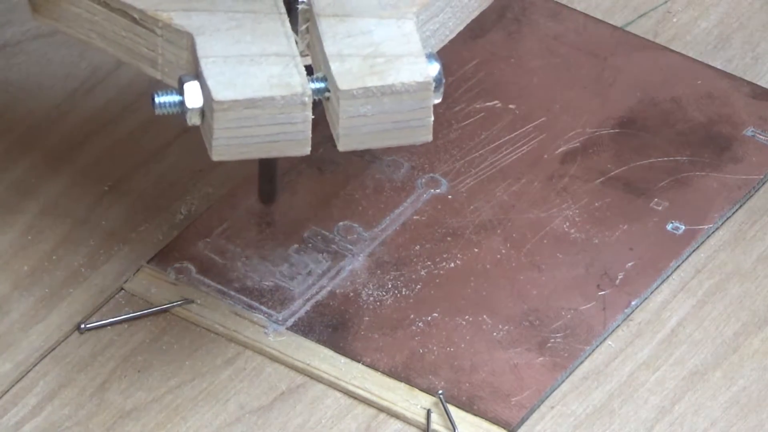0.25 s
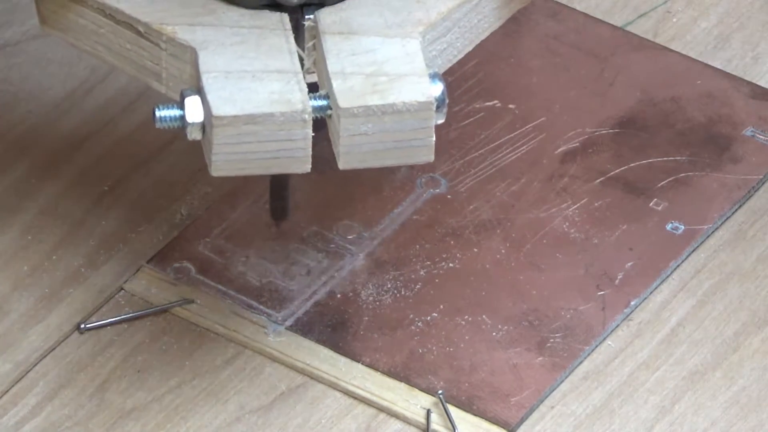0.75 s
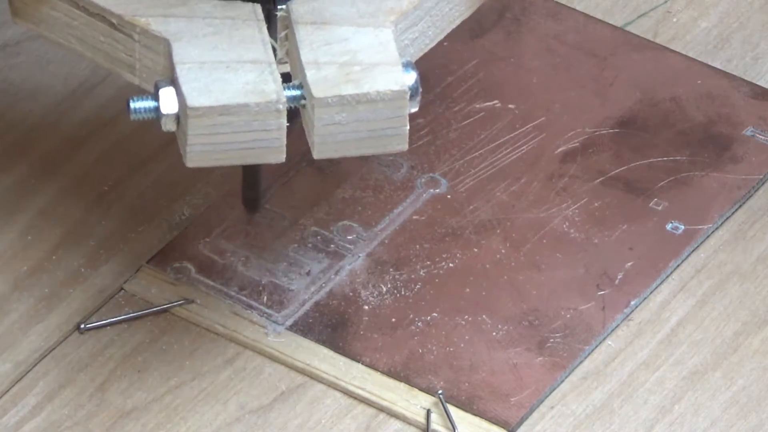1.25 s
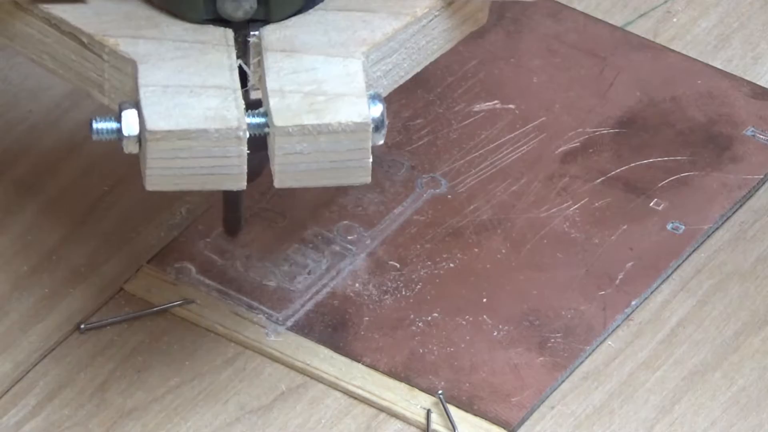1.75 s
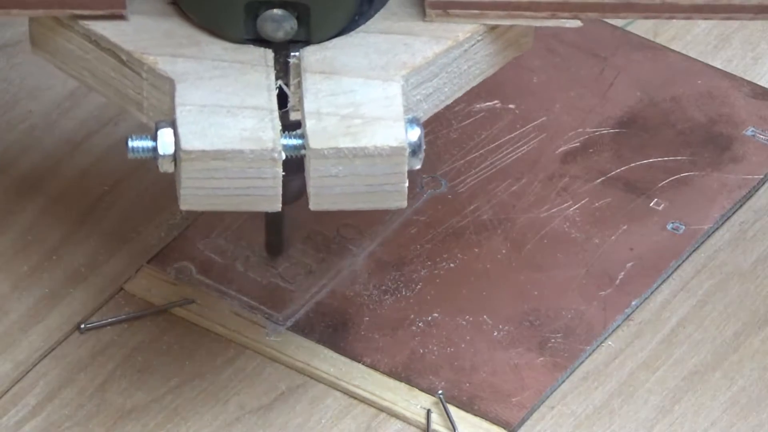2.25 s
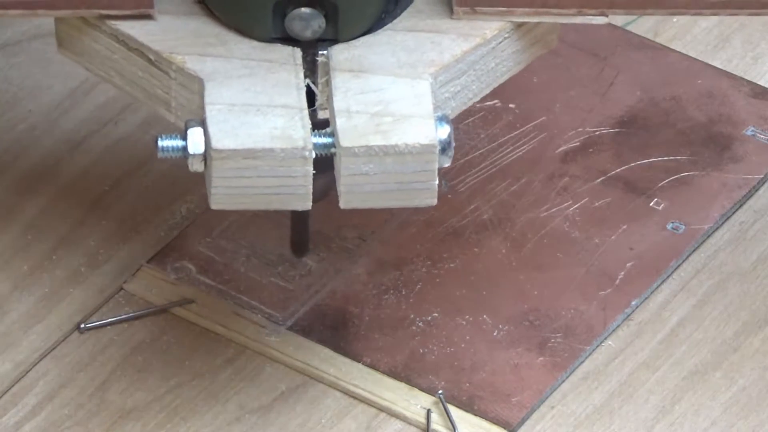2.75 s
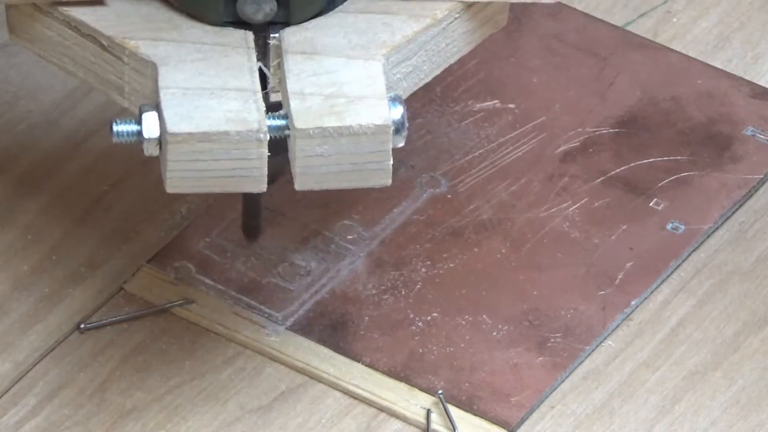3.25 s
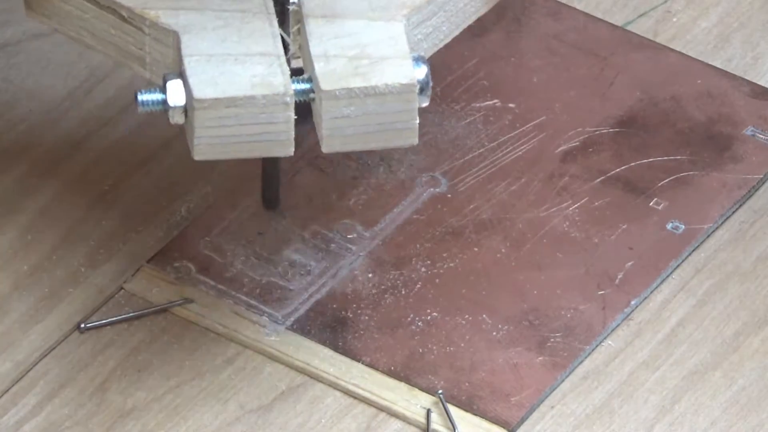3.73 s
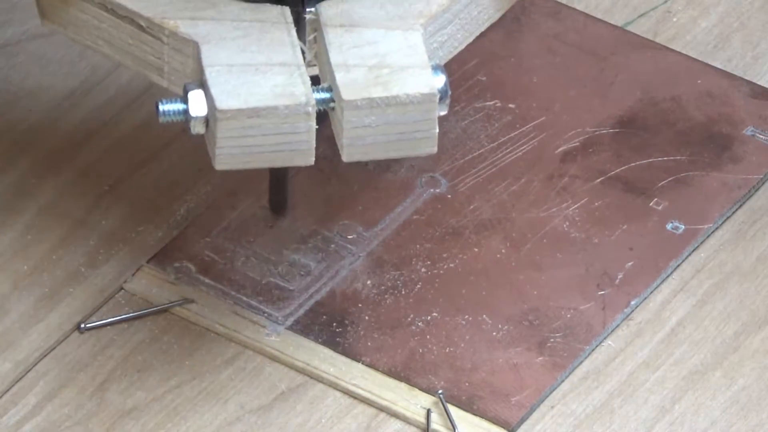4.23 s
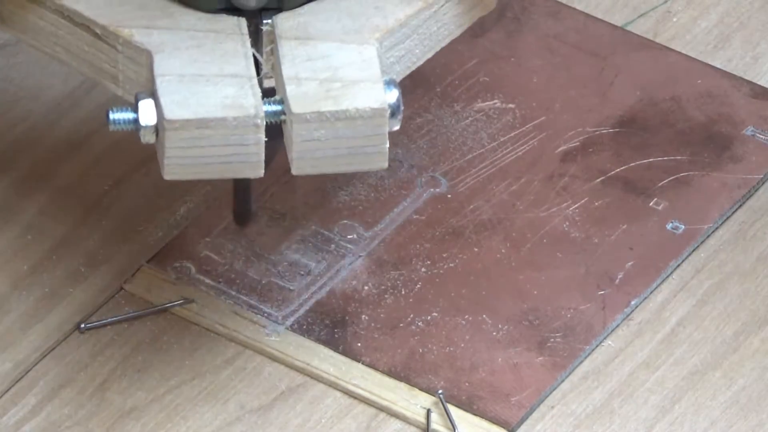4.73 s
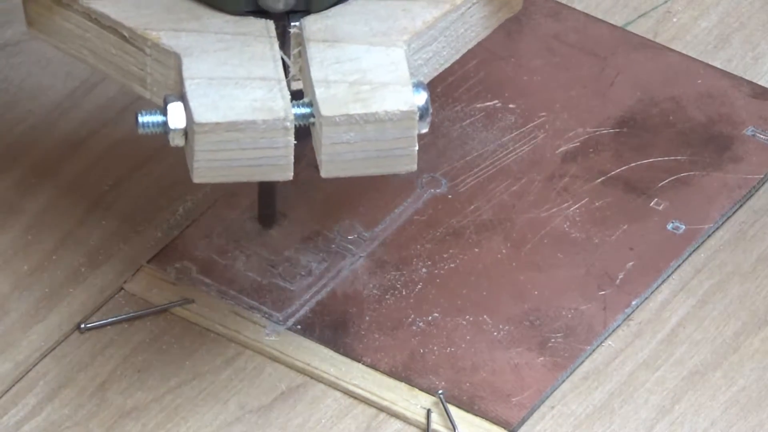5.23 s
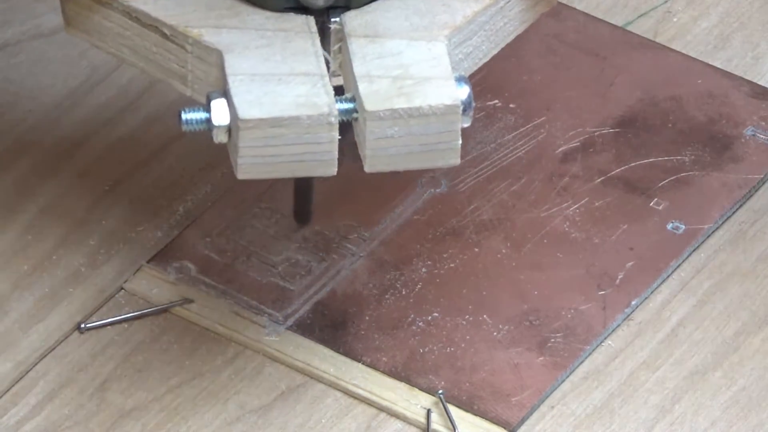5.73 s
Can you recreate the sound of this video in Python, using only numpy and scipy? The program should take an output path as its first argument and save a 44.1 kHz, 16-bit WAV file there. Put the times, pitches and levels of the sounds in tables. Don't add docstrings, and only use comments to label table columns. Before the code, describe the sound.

A small high-speed rotary tool engraves a thin copper-clad board, heard close in stereo in a quiet room. From 0 to about 2.6 s the bit cuts steadily: a shrill, buzzing whine near 1.8 kHz with strong overtones, slightly wavering in pitch and brightness, with dry chip rasp, board ringing and a faint groan below. Soft low bumps through the bench come around 1.0, 1.3 and 2.5 s. At about 2.6 s the bit barely lifts and the tone weakens. Clearer lifts follow near 2.96, 3.37, 3.73, 4.07 and 4.44 s, each lasting roughly 0.2 to 0.35 s: a short rip, the squeal falls away, a fast metallic rattle of the free shaft takes over, then the whine jumps back. From 4.8 s to the end at about 6 s cutting is continuous again, with motor hum, airy whir and quiet rumble beneath.

```python
import sys
import numpy as np
from scipy import signal
from scipy.fft import rfft, irfft, next_fast_len
from scipy.io import wavfile
from scipy.ndimage import uniform_filter1d

SR = 44100
rng = np.random.default_rng(int(sys.argv[2]) if len(sys.argv) > 2 else 0)


def master_out(mix):
    frames = np.transpose(np.atleast_2d(mix))
    ceiling = np.clip(frames, -1, 1)
    pcm = np.round(ceiling * 32767).astype(np.int16)
    wavfile.write(sys.argv[1], SR, pcm)


def voltage_ratio(level):
    return 10 ** (np.asarray(level, float) / 20)


N = 263718
SIZE = next_fast_len(N)
TIME = np.arange(N) / SR
FREQ = np.maximum(np.arange(SIZE // 2 + 1) * SR / SIZE, 1)
SHAFT_HZ = 166.27

# (start [s], end [s], clatter [dB], cutting sound left [dB], first touch [s])
LIFTS = [
    (2.58, 2.954, -11.5, -1.06, 2.93),
    (2.956, 3.21, -2, -12, 3.16),
    (3.365, 3.572, -2.2, -6, 3.532),
    (3.725, 3.923, -4.5, -3.5, 3.894),
    (4.069, 4.274, -3.5, -5.5, 4.215),
    (4.441, 4.8, -3, -5.5, 4.75),
]
# (frequency [Hz], level [dB per kHz])
WHIR = [(300, -105), (700, -97), (1200, -89), (2100, -80), (3000, -78), (3800, -71.5), (4500, -79),
        (5700, -70), (7500, -80.5), (9500, -79.5), (12000, -70.5), (14000, -87), (15500, -84)]


def along(table):
    hz, value = np.transpose(table)
    return np.interp(np.log(FREQ), np.log(hz), value)


def shaped(x, gain):
    return irfft(rfft(x, SIZE) * gain, SIZE)[..., :N]


def hiss(gain, gate=1):
    return shaped(gate * rng.standard_normal((2, N)), gain * np.sqrt(SR / 2000))


def walk(rate):
    knots = np.arange(0, N / SR + 1, 1 / rate)
    return 1.22 * np.interp(TIME, knots, rng.standard_normal(len(knots)))


def tone(turns, db):
    return np.sqrt(2) * voltage_ratio(db) * np.sin(2 * np.pi * (turns + rng.random()))


def during_lifts(gains):
    held_gain = sum(g * ((TIME > a) & (TIME < b)) for (a, b, *_), g in zip(LIFTS, gains))
    return uniform_filter1d(held_gain, int(0.0046 * SR))


def biting(share):
    return 1 - during_lifts([1 - voltage_ratio(share * row[3]) for row in LIFTS])


def held(table, slew_s):
    start, *columns = np.transpose(table)
    row = (np.searchsorted(start, TIME, "right") - 1).clip(0)

    def ease(x):
        return uniform_filter1d(x, int(slew_s * SR), mode="nearest")

    return ease, TIME - start[row], [c[row] for c in columns]


def swells(table):
    return sum(db * np.exp(-((TIME - s) / half) ** 4) for s, half, db in table)


def fading(since, tau):
    return (since > 0) * np.exp(-np.abs(since) / tau)


def room():
    # (frequency [Hz], level [dB per kHz])
    rumble_color = [(20, -100), (50, -102), (120, -90.5), (220, -87), (310, -97), (500, -99), (900, -112)]
    # (time [s], level [dB])
    knocks = [
        (1.01, -91),
        (1.28, -84),
        (1.4, -93.5),
        (1.72, -97),
        (2.46, -92),
        (2.62, -107),
        (2.78, -102),
        (3.151, -92.5),
        (3.28, -89),
        (3.68, -95),
    ]
    bumps = voltage_ratio(-101) + sum(voltage_ratio(db) * np.exp(-((TIME - s) / .035) ** 2) for s, db in knocks)
    rumble_db = 92.0 + 4.6 * walk(14) + during_lifts([5.0] * len(LIFTS))
    rumble = hiss(voltage_ratio(along(rumble_color)), bumps * voltage_ratio(rumble_db))
    whir_gain = voltage_ratio(walk(17) - during_lifts([2.5] * len(LIFTS)))
    return hiss(voltage_ratio(along(WHIR))) * whir_gain + rumble


def motor(shaft):
    # (start [s], level at 3x speed [dB], level at 6x speed [dB])
    stances = [
        (0, -92.5, -89.5),
        (.62, -87, -88),
        (1.7, -93, -90.5),
        (2.38, -94, -86),
        (3.4, -92, -86.5),
        (5.1, -93.5, -89),
        (5.6, -89, -83),
    ]
    ease, _, (low_db, high_db) = held(stances, 0.16)
    low = tone(3 * shaft, ease(low_db) + walk(6.1))
    high = tone(6 * shaft, ease(high_db) + walk(6.2))
    return low + high + tone(9 * shaft, -93 + 3 * walk(4.7))


def clatter(shaft):
    # (frequency [Hz], level [dB rms])
    lines = [(1330, -90.5), (3160, -80.5), (3327, -74.5), (3494, -76), (3828, -76.5), (3994, -81.5),
             (4161, -88.5), (4657, -84), (4823, -78), (4990, -82), (5152, -77.5), (5324, -77),
             (5486, -74.5), (5663, -75), (5819, -80.5), (5992, -78), (6158, -79), (6492, -85.5),
             (6993, -84), (7149, -70), (7483, -72.5), (7655, -73.5), (7811, -80.5), (8990, -75),
             (9157, -65.5), (9324, -73.5), (9641, -71.5), (10497, -84), (11445, -78)]
    shares = np.array([0.0058, 0.58, 0.96, 0.93, 0.57, 0.0071])
    free = 0
    for a, b, db, _, touch in LIFTS:
        times = [a, a + 0.0039, a + 0.048, touch - 0.037, touch, b]
        free = free + np.interp(TIME, times, voltage_ratio(db + 1) * shares)
    on = free > 0
    out = np.zeros(N)
    for hz, db in lines:
        out[on] += tone(round(hz / SHAFT_HZ) * shaft[on], db + 1.5 + 2.4 * walk(6)[on])
    turn = rng.standard_normal(512)[(shaft % 1 * 512).astype(int)]
    knocks = shaped(turn, voltage_ratio(along(WHIR)) * np.sqrt(SR / 2000))
    return free * (out + voltage_ratio(2.0) * knocks)


def tears():
    rip = sum(np.exp(-((TIME - row[0] + 0.01) / 0.009) ** 2) for row in LIFTS[1:])
    ring = voltage_ratio(-55.5) / (1 + ((FREQ - 5300) / 250) ** 2)
    ring = ring + voltage_ratio(-69.5) / (1 + ((FREQ - 1700) / 150) ** 2)
    return hiss(ring, rip)


def chips(turns, shaft, rasp_db, groan_db):
    # (frequency [Hz], level [dB])
    rasp_color = [(1500, -39), (2100, -7.5), (2600, -3.5), (4500, -3), (5300, 5.5), (6400, 0.8),
                  (8200, 4.5), (9600, 3.5), (11000, -6), (13500, -0.5), (15000, -4), (15600, -13.5)]
    # (frequency [Hz], level [dB])
    groan_color = [(350, -16.5), (600, -11.5), (900, -3.5), (1250, -5), (1550, 7), (1750, 1), (2000, -38),
                   (2500, -16.5)]
    # (frequency [Hz], width [Hz], level [dB])
    board_modes = [(5086, 43, 2.5), (5650, 13, -0.5)]
    gate = 1 + 0.33 * np.cos(2 * np.pi * turns)
    gate = gate * (1 + 0.08 * np.cos(2 * np.pi * 3 * shaft)) * voltage_ratio(1.1 * walk(30))
    ring = 1 + sum(voltage_ratio(db) / (1 + 1j * (FREQ - hz) / (width / 2)) for hz, width, db in board_modes)
    bite = np.sqrt(np.clip(voltage_ratio(rasp_db) ** 2 - voltage_ratio(-74) ** 2, 0, 1)) * biting(0.84)
    groan = hiss(voltage_ratio(along(groan_color))) * voltage_ratio(groan_db + 1.53 * walk(25))
    return hiss(voltage_ratio(along(rasp_color)) * ring, gate) * bite + groan


def whirl(turns, rasp_db):
    # (multiple of chatter rate [1], level over rasp [dB])
    side_tones = [(2.84, -8.5), (3.115, -13.5), (4.723, -8), (5.255, 2), (5.72, -12.5), (6.253, -4.5),
                  (6.744, -11), (7.254, -9.5)]
    out = 0
    for k, db in side_tones:
        out = out + tone(k * turns + 0.034 * walk(59), rasp_db + db + 3.9 * walk(13))
    return biting(1.9) * out


def beat(turns, shaft, third_db):
    sideband = 3 * turns + 3 * shaft
    hz = np.gradient(sideband) * SR
    on_mode = 1 / (1 + ((hz - 5838) / 22) ** 2)
    return on_mode * tone(sideband, third_db - 19.5 + 4.0 * walk(16))


def feed():
    # (start [s], chatter rate [Hz], drift [Hz/s], depth of cut [dB], bending of the bit [dB])
    strokes = [(0, 1774, 208, -63, -49), (.09, 1808, -110, -59, -52), (.289, 1779, 47, -58, -52),
               (.585, 1778, -24.5, -63.5, -56), (.66, 1776, 110, -63.5, -46.5),
               (.79, 1803, -0.5, -60.5, -47.5), (1.005, 1794, -1.5, -58, -55.5),
               (1.07, 1806, -30, -61, -47), (1.245, 1782, -7.5, -61, -53),
               (1.68, 1797, -75.5, -56.5, -52.5), (1.8, 1787, 0, -56, -49.5), (2.27, 1787, 85, -58, -52),
               (2.41, 1797, -55.5, -59, -52.5), (2.585, 1821, 20.5, -73.5, -61),
               (2.73, 1815, -8, -63.5, -59.5), (3.1, 1803, 10, -60.5, -53), (3.5, 1802, -5, -61, -53),
               (3.85, 1799, -11.5, -61.5, -53), (4.2, 1797, 4.5, -61, -51.5), (4.7, 1821, -170, -60.5, -53),
               (4.91, 1779, 41, -60, -52.5), (5.06, 1780, 42, -57.5, -50), (5.42, 1786, 28.5, -57, -50.5),
               (5.6, 1787, -1, -59.5, -50)]
    # (milling along [dB], plunging [dB], share of depth changes [1])
    overtones = [(-62, -64, 0.37), (-61, -58, 0.41), (-67.5, -62.5, 0.067), (-70, -76.5, .1),
                 (-68.5, -67.5, .5), (-74.5, -71, 0.59)]
    # (center [s], half length [s], level [dB])
    bending = [(.075, 0.022, -11), (.17, 0.032, -8), (.795, 0.017, -5), (1.53, 0.0068, 5),
               (2.375, 0.052, -3.5), (2.622, 0.011, -16), (2.644, 0.0095, 8), (2.68, 0.014, -6),
               (2.78, 0.039, -13), (2.6, 0.0099, 6), (2.93, 0.0086, 8.5), (2.95, .008, 8), (1.3, 0.085, 4),
               (4.9, 0.023, -8), (3.6, 0.013, -1), (3.97, .015, 2), (4.05, .03, -6)]
    # (center [s], half length [s], level [dB])
    low_swells = [
        [(.25, .03, 4.5), (.33, 0.07, -6), (.52, 0.048, -10), (5.75, .2, 4), (.9, 0.11, 4.5),
         (1.12, 0.072, 4.5), (2.52, .06, 7), (4.97, .1, 5)],
        [(.22, 0.052, -12), (.28, 0.019, 9.5), (.62, 0.043, -8), (.85, 0.095, -8), (1.77, .03, -10),
         (2.5, 0.086, -12), (4.9, .03, -4), (5.12, .06, 5.5), (5.75, 0.19, -3)],
        [(.13, 0.082, 10.5), (.28, 0.033, -4), (.85, 0.43, 2), (1.86, 0.02, -15), (2.47, 0.041, -16),
         (.43, .04, 9), (.54, 0.05, 7), (1.72, .06, 11), (2.22, 0.059, 9), (2.37, 0.042, 17), (2.83, .1, 8),
         (5.33, 0.057, 12), (5.49, 0.043, 6.5)],
    ]
    # (center [s], half length [s], level [dB])
    top_swells = [
        [(.03, .05, 5.5), (.72, 0.056, 12), (.95, 0.093, -9), (1.5, 0.31, 8), (2.3, .15, -7), (2.8, .12, 8),
         (4.35, 0.055, 11), (5.35, .25, -9)],
        [(.08, 0.073, -3), (.72, 0.092, 8), (1.15, .06, -3), (1.45, 0.16, 0), (1.9, 0.25, 2.5),
         (2.45, 0.13, -7), (3.3, .05, -8), (5.2, 0.35, 7.5), (5.8, 0.13, -7)],
        [(.08, .03, -11), (.4, 0.14, 10), (1.4, .1, -5), (1.65, 0.068, -6), (2.3, 0.05, 5), (4.95, .08, 8),
         (5.3, 0.11, 4), (5.6, 0.075, -4)],
    ]
    release_s = 0.01123

    ease, since, (hz, drift, depth, bend) = held(strokes, .035)
    hz, depth, bend = ease(hz + drift * since), ease(depth), ease(bend)
    deeper = depth + 57.5

    full = LIFTS[1:]
    free, off = 0, 0
    for a, b, _, _, touch in full:
        free = free + np.interp(TIME, [a - .004, a + release_s, touch + .015, b + .045], [0, 1, 1, 0])
        times = [a - .003, a + release_s - .003, touch - 0.021, touch, b]
        off = off + np.interp(TIME, times, [0, -23.5, -20, -13.5, 0])
    jolt = 5 * sum(fading(TIME - row[1], 0.021) for row in full)
    settle = 4 * sum(fading(TIME - row[1], 0.066) for row in full)
    tear = 7 * sum(fading(row[0] - TIME, 0.0067) for row in full)

    plunging = (TIME > full[0][0]) & (TIME < full[-1][1] + .03)
    wander_db = [0, 1, 2.1, 1.8, 2.025, 2.75]
    edge = []
    for (mill, plunge, share), rows, wander in zip(overtones, [*low_swells, *top_swells], wander_db):
        db = np.where(plunging, plunge, mill) + share * deeper + jolt + 1.3 * off
        edge.append(db + swells(rows) + wander * walk(14))
    first = depth + off + settle + 0.1 * tear
    third = bend + swells(bending) + 0.66 * off + 0.29 * jolt + 0.84 * settle + tear
    levels = [first, edge[0] + .4 * tear, third] + edge[1:]

    rasp = -70 + 0.088 * deeper + 0.23 * walk(6.4)
    groan = -79 + 0.21 * deeper + 1.04 * off + 0.69 * settle + 1.7 * walk(8)
    return hz + free * (11 * SHAFT_HZ - hz), levels, rasp, groan


def chatter(turns, levels_db, shaft):
    cutting = biting(1.5)
    out = 0
    for k, db in enumerate(levels_db, 1):
        poles = 0.023 * voltage_ratio(4.8 * walk(1.7)) * np.cos(2 * np.pi * (3 * shaft + rng.random()))
        wobble = 0.0024 * k * walk(90)
        flutter_db = (0.12 + 0.33 * k) * walk(22.017)
        partial = (1 + 0.046 * walk(250) + poles) * tone(k * turns + wobble, db + flutter_db)
        out = out + partial * (1 if k in (1, 3) else cutting)
    return out


def scene():
    # (frequency [Hz], level [dB])
    port_level = [(60, 3), (110, 2), (200, 3), (380, 2.5), (700, 1.5), (1290, -1.5), (2380, 0.5),
                  (4400, 3.5), (8120, 1), (15000, 5)]
    # (frequency [Hz], phase [rad])
    port_phase = [(0, 0), (4570, -0.0), (6800, 1), (7150, -1.3), (7580, 0.5), (8010, -1.0), (9650, -0.86),
                  (9910, -1.2), (12700, -1), (13100, 0.5), (13600, -2.7), (14400, 1.5), (14900, -5.5),
                  (15300, -9)]
    # (frequency [Hz], level [dB])
    unlike = [(30, -16), (250, -24), (1000, -30), (4000, -27), (8000, -7.5), (13000, -7)]
    hz, levels_db, rasp_db, groan_db = feed()
    turns = np.cumsum(hz + 1.24 * walk(25)) / SR
    shaft = np.cumsum(SHAFT_HZ + .06 * walk(1.5)) / SR
    tones = motor(shaft) + clatter(shaft) + whirl(turns, rasp_db)
    tones = tones + beat(turns, shaft, levels_db[2]) + chatter(turns, levels_db, shaft)
    noise, other = room() + tears() + chips(turns, shaft, rasp_db, groan_db)
    half = voltage_ratio(along(port_level) / 2) * np.exp(.5j * along(port_phase))
    ports = np.array([half, 1 / half]) * 2 / np.abs(half + 1 / half).clip(.7)
    side = shaped(other, voltage_ratio(along(unlike)))
    return shaped(tones + noise + np.array([side, -side]), ports)


def roll_off(x):
    return signal.sosfilt(signal.butter(12, 15720, fs=SR, output="sos"), x)


def record(dry):
    low_cut = signal.butter(2, 50, "high", fs=SR, output="sos")
    mix = signal.sosfilt(low_cut, dry)
    return roll_off(mix)


dry = scene()
out = record(dry)
master_out(out)
```